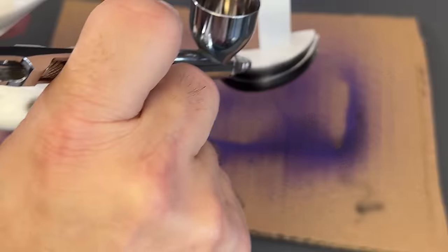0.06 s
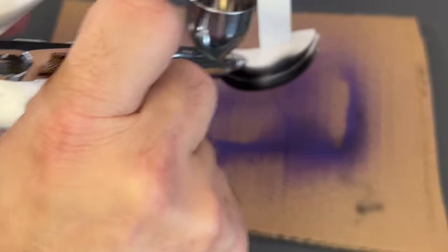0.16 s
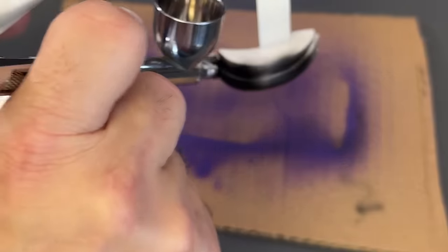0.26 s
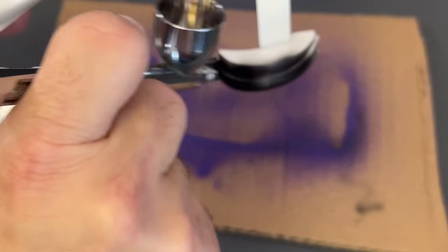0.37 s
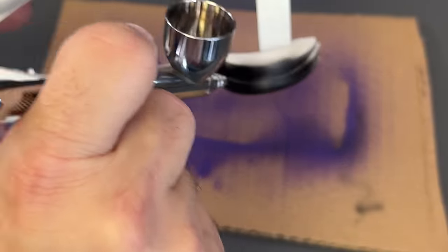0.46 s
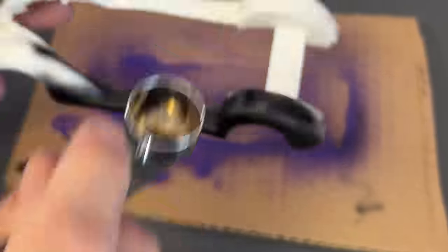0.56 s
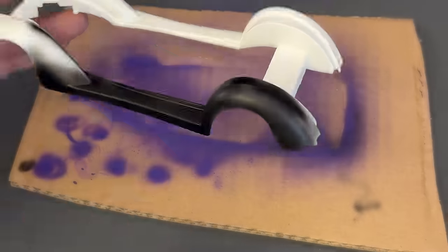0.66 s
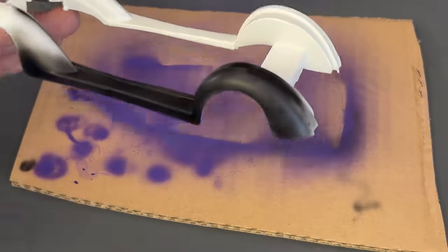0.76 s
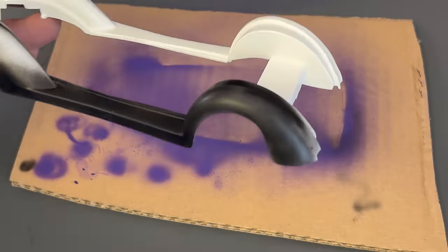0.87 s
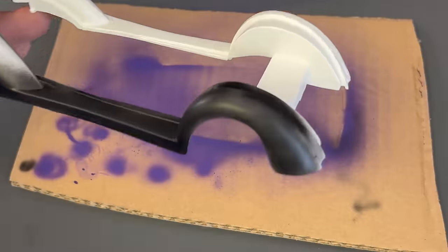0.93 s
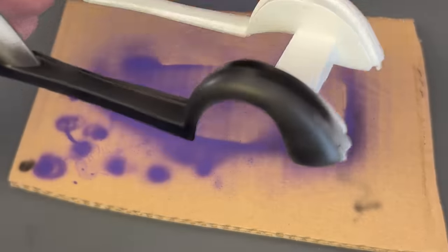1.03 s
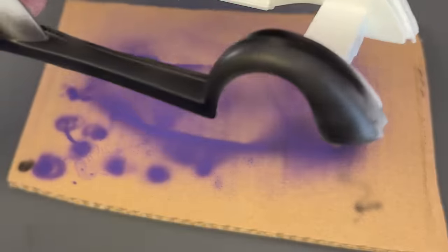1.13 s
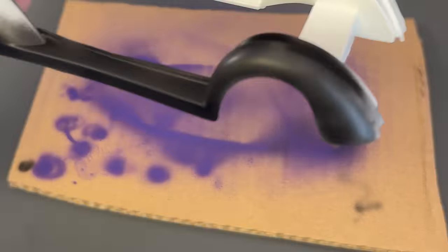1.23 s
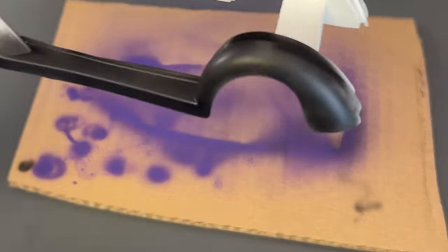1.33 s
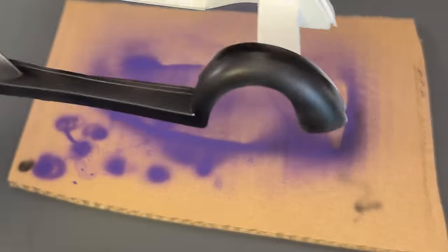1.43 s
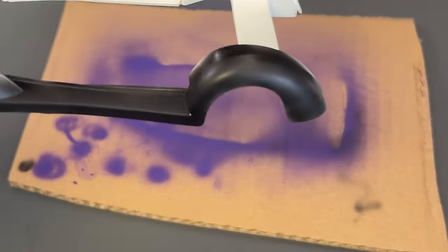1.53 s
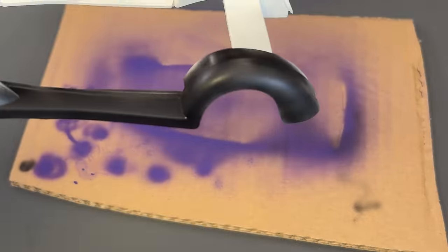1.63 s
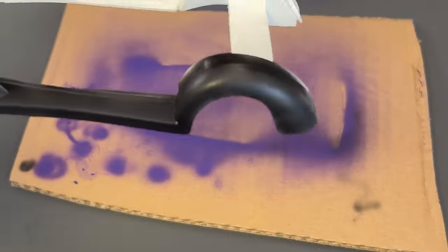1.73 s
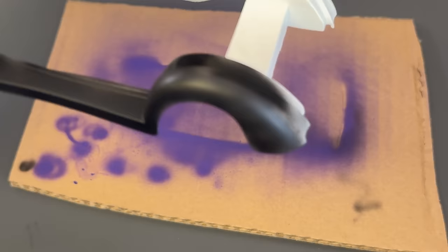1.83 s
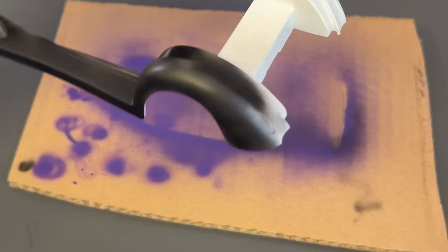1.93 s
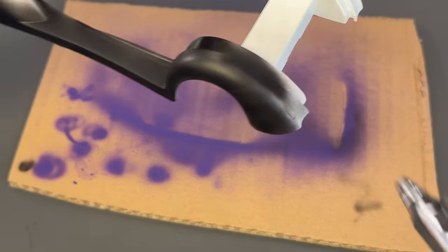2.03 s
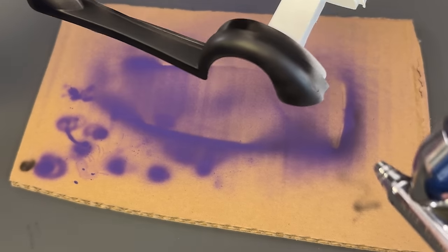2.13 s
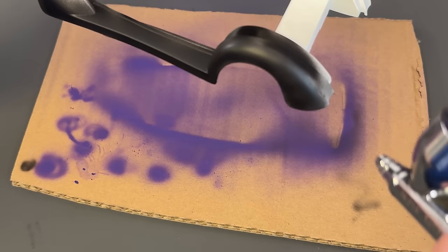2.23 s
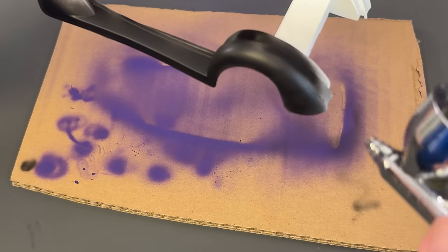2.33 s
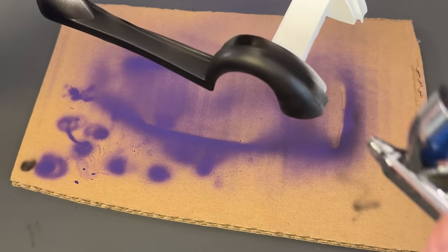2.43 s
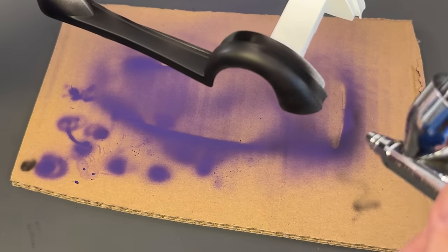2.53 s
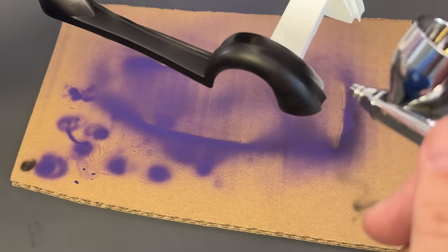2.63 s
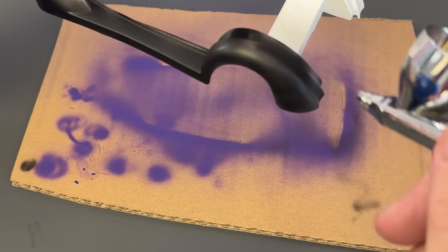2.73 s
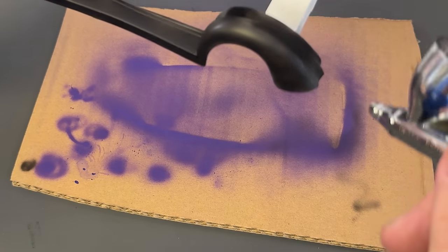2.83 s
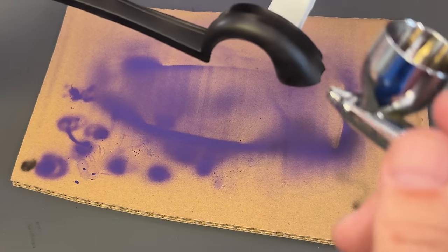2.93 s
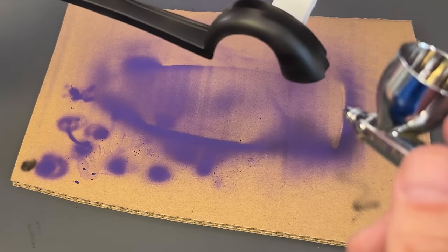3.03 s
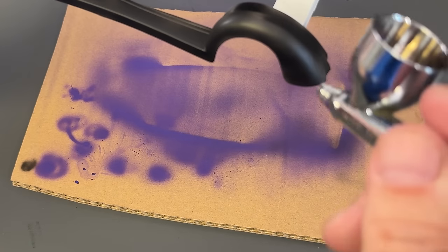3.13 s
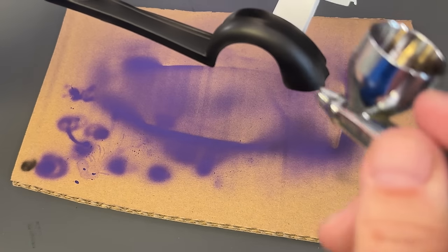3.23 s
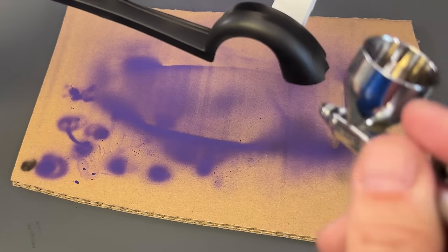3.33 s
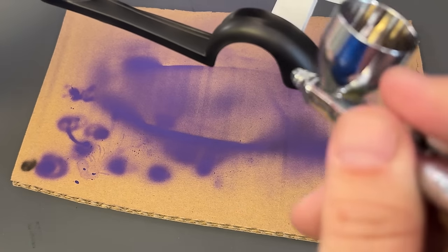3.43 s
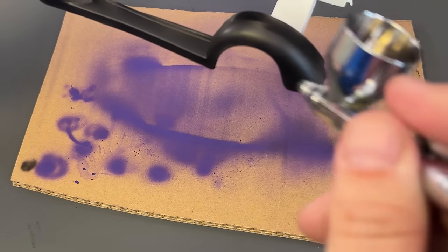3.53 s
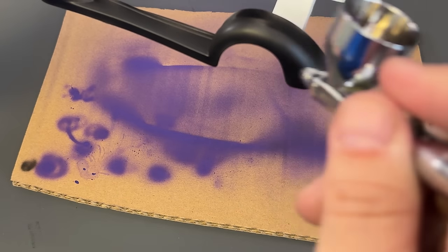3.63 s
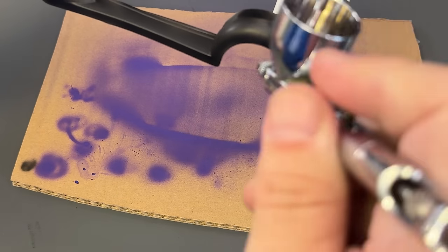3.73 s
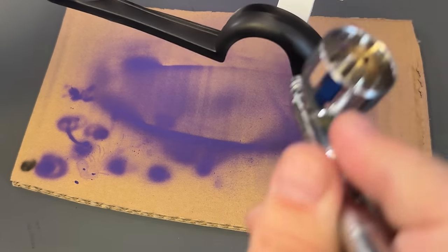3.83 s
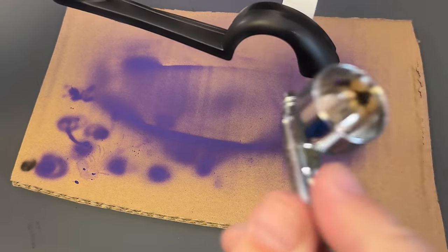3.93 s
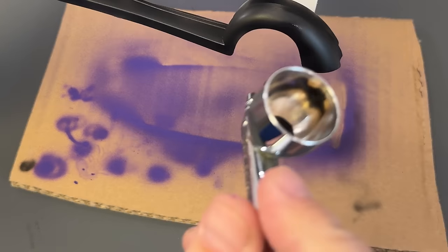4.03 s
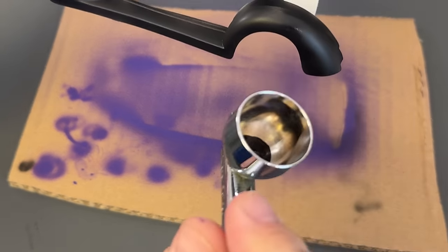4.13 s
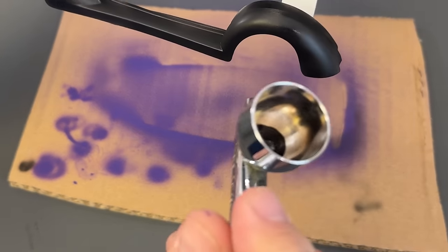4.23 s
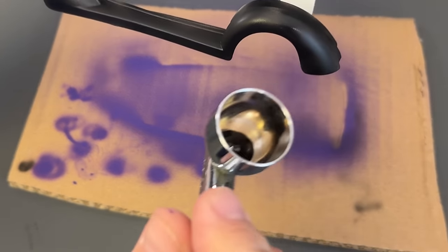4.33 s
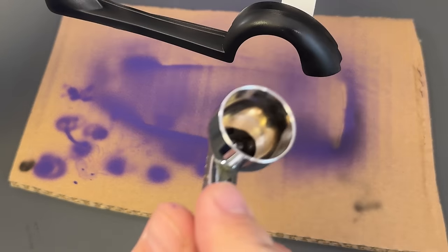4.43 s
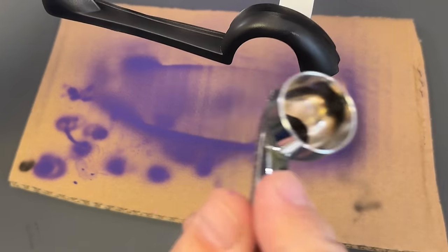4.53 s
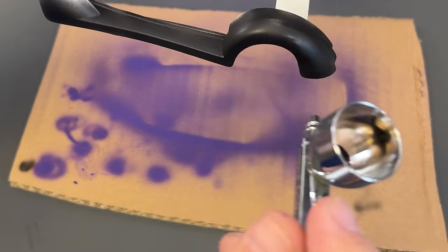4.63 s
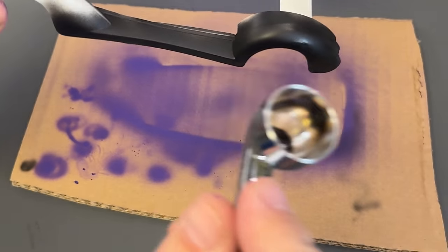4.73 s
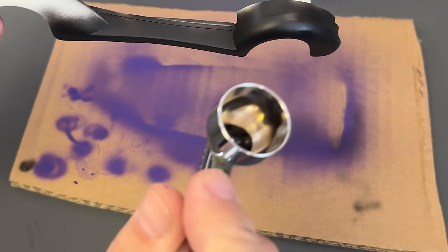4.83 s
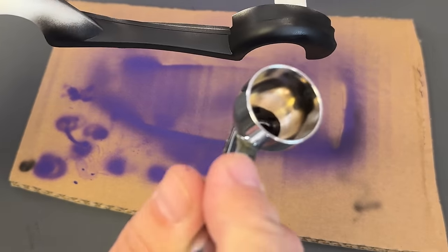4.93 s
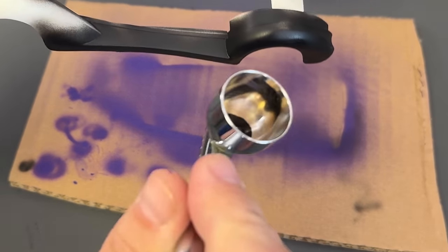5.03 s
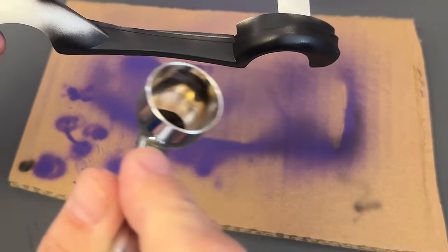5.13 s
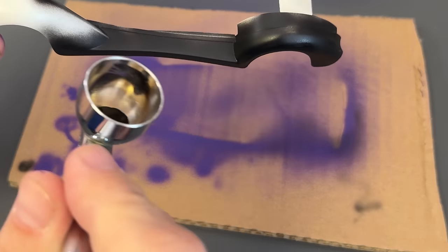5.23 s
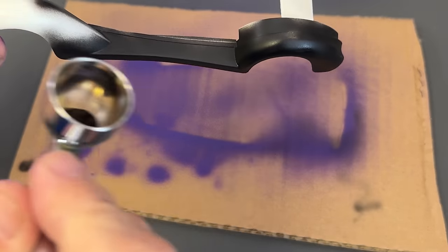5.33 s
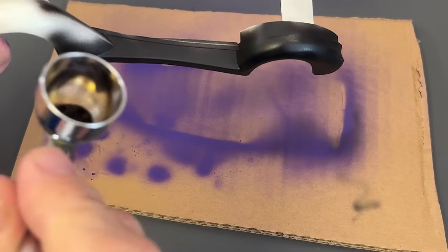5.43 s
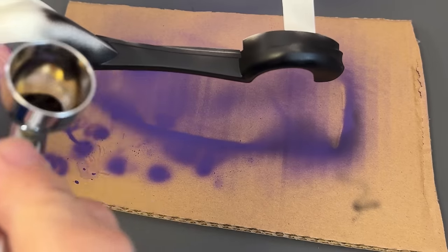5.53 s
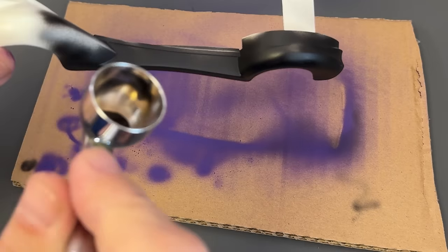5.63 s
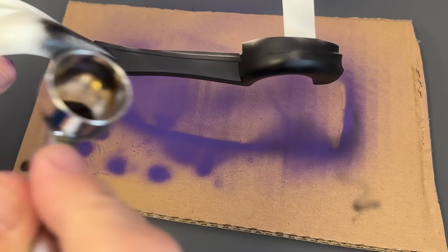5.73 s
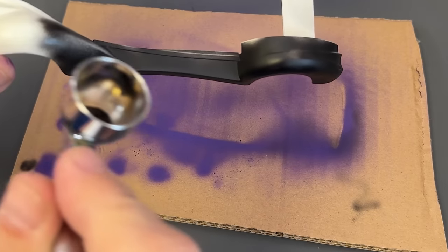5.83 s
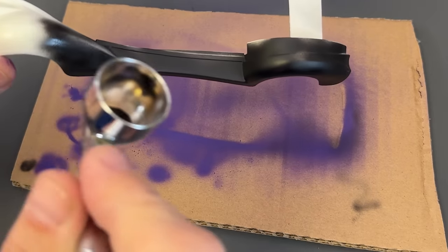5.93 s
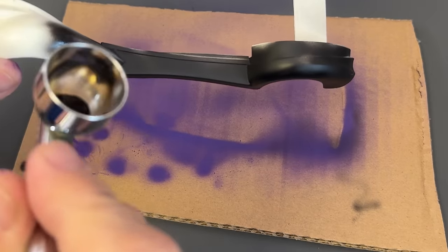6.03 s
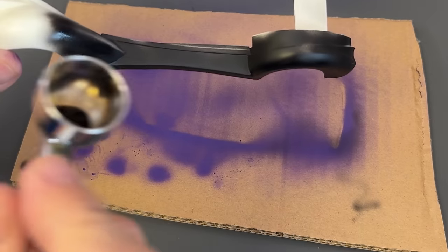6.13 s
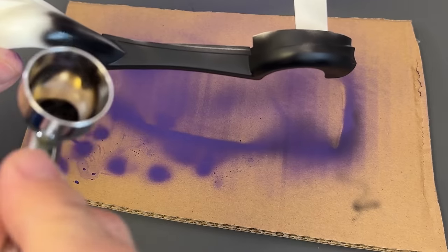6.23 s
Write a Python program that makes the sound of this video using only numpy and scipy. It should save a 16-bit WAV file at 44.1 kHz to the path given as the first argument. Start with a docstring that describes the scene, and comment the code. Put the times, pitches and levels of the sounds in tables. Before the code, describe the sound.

An airbrush sprays a small plastic part with a bright hiss and a lower rush of air. It cuts off after half a second, and the trigger clicks back. A faint air leak fills the pause, then a tiny spit opens a longer spell that swells and shifts in tone as the jet travels over the part. An extractor fan drones behind throughout, heard in a spray booth with close stereo microphones.

```python
"""A bright hiss and rush of air, close to a stereo microphone pair: an airbrush paints a small plastic
part in a spray booth, in two spells, with the extractor fan droning behind. The free jet hisses;
where it strikes the part it rushes lower, coloured by the rim, arch or arm that it meets, and swells
at each edge. The trigger clicks as it springs back after the first spell, and a faint leak hisses
until a spit of paint opens the second."""
import sys
import numpy as np
from scipy import signal
from scipy.fft import rfft, irfft
from scipy.io import wavfile
from scipy.ndimage import map_coordinates

SR = 44100
rng = np.random.default_rng(int(sys.argv[2]) if len(sys.argv) > 2 else 0)


def file_out(sig):
    """Save sig as 16-bit WAV at sys.argv[1]."""
    # one column per channel
    cols = np.atleast_2d(sig).T
    # limit, then scale
    lim = np.clip(cols, -1, 1)
    pcm = np.round(lim * 32767).astype(np.int16)
    wavfile.write(sys.argv[1], SR, pcm)


N = 277389
TIME = np.arange(N) / SR
FREQS = np.maximum(np.arange(N // 2 + 1) * SR / N, 1)

MOTOR_TURNS_HZ = 63.14
# strong overtones of the fan motor [multiple of the turning rate, level/dB]
MOTOR_ORDERS = [(1, -74.5), (2, -66.5), (3, -64), (4, -68.5), (5, -72), (6, -69), (9, -71), (11, -74.5),
                (12, -67.5), (13, -72.5), (14, -71), (15, -75.5), (18, -73), (19, -70), (20, -75),
                (21, -72.5), (22, -77), (23, -73.5), (25, -77.5), (29, -78), (33, -76), (36, -76),
                (37, -77), (38, -80), (43, -79), (45, -79.5), (49, -78), (50, -84), (65, -78.5), (72, -81)]
# the two spells of the air valve [opens t/s, shuts t/s]
SPELLS = [(-0.1, 0.534), (2.121, 6.4)]
# the hand sweeps the jet full onto the face of the part [t/s, length/s, swell/dB]
FACE_PASSES = [(0.243, 0.056, 6), (0.295, .03, 5), (0.435, 0.065, 3.5), (0.522, 0.018, 6),
               (2.965, 0.066, 3.5), (3.14, 0.055, 6), (3.285, 0.075, 6.5), (3.46, 0.077, 6.5),
               (3.59, 0.1, 4), (3.745, 0.068, 4), (3.885, 0.05, 5.5), (4.08, 0.036, 2), (4.52, 0.06, 3.5),
               (4.735, 0.07, 3), (4.88, 0.05, 1.5), (5.02, 0.085, 2), (5.31, 0.091, 3.5),
               (5.41, 0.084, 3.5), (5.555, 0.085, 4), (6.21, 0.074, 3)]
# spectrum of air on the part's flat arm, and of the spit [f/Hz, level/dB]
ARM_SPECTRUM = [(400, -12), (750, -4.5), (1150, -1), (1520, 2), (1850, -1.5), (2300, 0), (3050, -5),
                (3950, -1.5), (5300, -6), (6300, -6), (7300, -10), (8300, -10), (9000, -11.5), (12500, -11)]


def from_db(db):
    return 10 ** (np.asarray(db) / 20)


def rms_one(x):
    return x / np.sqrt(np.mean(x ** 2) + 1e-20)


def in_time(rows):
    """Each column of a curve at every sample."""
    times, *columns = np.transpose(rows)
    return [np.interp(TIME, times, column) for column in columns]


def during(span, ramp_s):
    """1 inside the span (from t/s, to t/s), with soft ends."""
    return np.clip(np.minimum(TIME - span[0], span[1] - TIME) / ramp_s + .5, 0, 1)


def swells(events, order=2):
    """A bell of dB per event, half as high at the ends of its length; higher orders flatten the top."""
    return sum(db * .5 ** (np.abs(2 * (TIME - t) / length) ** order) for t, length, db in events)


def drift(rate_hz):
    """A smooth random wander, rms 1."""
    knots = rng.standard_normal(int(N / SR * rate_hz * 2) + 2)
    return rms_one(np.interp(TIME * rate_hz * 2, np.arange(len(knots)), knots))


def colour(points):
    """Gain at every frequency from a short spectrum, falling away past its ends."""
    hz, db = np.transpose(points)
    ends = np.minimum(1, np.minimum(FREQS / hz[0], hz[-1] / FREQS)) ** 2
    return ends * from_db(np.interp(np.log(FREQS), np.log(hz), db))


def resonances(modes, order=2):
    """Gain at every frequency of resonances summed in power; higher orders give flatter tops."""
    gains = (from_db(db) / (1 + 2 * ((FREQS - hz) / width) ** order) for hz, width, db in modes)
    return np.sqrt(sum(gain ** 2 for gain in gains))


def noise(gain):
    """Turbulence of the given colour, rms 1."""
    return rms_one(irfft(rfft(rng.standard_normal(N)) * gain, N))


def swept(x, rows, width_hz):
    """Lifts or cuts one moving band."""
    hz, db = in_time(rows)
    carrier = np.exp(2j * np.pi * np.cumsum(hz) / SR)
    baseband = signal.filtfilt(*signal.butter(2, width_hz, fs=SR), x / carrier)
    band = 2 * np.real(carrier * baseband)
    return x + (from_db(db) - 1) * band


def widened(mid, side, width):
    """Left and right from a shared sound and an unrelated one, coloured by the width spectrum."""
    side = irfft(rfft(side) * colour(width), N)
    return np.array([mid + side, mid - side])


def wall_echoes(x, t60_s):
    """The booth's walls return a dense, dying scatter with about the power of the sound."""
    age = TIME[:SR // 3]
    echoes = rng.standard_normal(len(age)) * from_db(-60 * age / t60_s) * (age > .001)
    return signal.fftconvolve(x, echoes / np.linalg.norm(echoes))[:N]


def rumble(hz=89, width_hz=16, start_db=-60.5, fall_db_per_s=2):
    """A low rumble under the fan, slowly fading."""
    return from_db(start_db - fall_db_per_s * TIME) * noise(resonances([(hz, width_hz, 0)], order=4))


def motor_whine(order_limit=72, uneven_db=3.5, speed_wander=0.00051):
    """Every turn of the motor repeats one rough pattern: faint overtones between the strong ones."""
    turns = np.cumsum(MOTOR_TURNS_HZ * (1 + speed_wander * drift(1.8))) / SR
    orders = np.setdiff1d(np.arange(1, order_limit), [multiple for multiple, db in MOTOR_ORDERS])
    strength = from_db(uneven_db * rng.standard_normal(len(orders))) / np.sqrt(orders)
    angle = np.linspace(0, 1, 4096)
    cycles = np.outer(orders, angle) + rng.random((len(orders), 1))
    one_turn = strength @ np.sin(2 * np.pi * cycles)
    return rms_one(np.interp(turns % 1, angle, one_turn))


def fan_hum(trim_db=-1, waver_db=0.5, wander_rad=0.17, whistle_hz=2653):
    """The fan's hum, its motor's strong overtones and a thin whistle, each wavering a little."""
    # steady hum tones [f/Hz, level/dB]
    hum_tones = [(129.0, -64), (199.5, -67.5), (238.4, -60), (262.5, -56.5), (325.3, -66.5), (838, -75),
                 (1112, -72.5)]
    # the whistle grows [t/s, level/dB]
    whistle = [(0.6, -74), (0.88, -74), (0.98, -67), (1.6, -67.5), (2.1, -64.5)]
    overtones = [(multiple * MOTOR_TURNS_HZ, db) for multiple, db in MOTOR_ORDERS]
    hum = 0
    for hz, db in [*hum_tones, *overtones, (whistle_hz, in_time(whistle)[0])]:
        level = from_db(db + trim_db + waver_db * drift(4))
        phase = 2 * np.pi * (hz * TIME + rng.random()) + wander_rad * drift(3.0)
        hum += level * np.sin(phase)
    return np.sqrt(2) * hum


def extractor_fan(drone_db=-65, air_db=-56.5, duct_db=-61.5, whine_db=-72.5):
    """Behind the spray the motor hums, the booth's panels drone and air is drawn down the duct."""
    # panel resonances [f/Hz, width/Hz, level/dB]
    panel_modes = [(98, 19, 1), (132, 10, -1)]
    # air drawn through the fan [f/Hz, level/dB]
    air_spectrum = [(25, -44), (45, -21), (84, -16), (160, -6.5), (263, -11), (320, -10.5), (490, -12.7),
                    (734, -18.5), (1230, -24), (1940, -30.5), (2700, -31.5), (3340, -33), (6800, -38),
                    (8300, -43), (9500, -41), (10800, -34.5), (16000, -36.5)]
    # duct resonances [f/Hz, width/Hz, level/dB]
    duct_modes = [(269, 28, -1), (770, 120, -12.5), (1810, 65, -12.5), (2620, 95, -15), (4100, 60, -20),
                  (5500, 430, -28.5), (7040, 110, -27)]
    hum = fan_hum()
    drone = from_db(drone_db) * noise(resonances(panel_modes))
    air = from_db(air_db) * noise(colour(air_spectrum))
    duct = from_db(duct_db) * noise(resonances(duct_modes))
    return hum + from_db(whine_db) * motor_whine() + drone + air + duct


def leak():
    """Air leaks past the shut valve; it grows and swishes as the airbrush is brought back to the part."""
    # strength of the leak [t/s, level/dB]
    levels = [(0.58, -69), (1.0, -74), (1.35, -83), (1.76, -79), (1.9, -64.5), (2.12, -65)]
    # its spectrum [f/Hz, level/dB]
    spectrum = [(4500, -1), (15000, 0)]
    # its moving resonance [t/s, f/Hz, gain/dB]
    swish = [(1.8, 6300, 4), (1.89, 5450, 9), (1.98, 5300, 9), (2.05, 6050, 8)]
    hiss = rms_one(swept(noise(colour(spectrum)), swish, width_hz=520))
    valve_shut = during((SPELLS[0][1], SPELLS[1][0]), ramp_s=0.022)
    return from_db(in_time(levels)[0]) * valve_shut * hiss


def spill(peak_s=4.45, length_s=1.3, rest_db=-82, swell_db=25.2, hz=606, width_hz=250):
    """Air that misses the part lands on the cardboard below with a dull rush."""
    level_db = rest_db + swells([(peak_s, length_s, swell_db)], order=4)
    return from_db(level_db) * noise(resonances([(hz, width_hz, 0)], order=4))


def spit(level_db=-43.5, hold_s=0.015, fall_db_per_s=548):
    """Paint left on the needle is blown off in one short burst as the valve reopens."""
    fall_db = fall_db_per_s * np.clip(TIME - SPELLS[1][0] - hold_s, 0, 1)
    return from_db(level_db - fall_db) * during(SPELLS[1], ramp_s=0.0082) * noise(colour(ARM_SPECTRUM))


def trigger(at_s=0.5573, gain_db=-25, crack_db=-1.5, crack_t60_s=0.002,
            rattle_db=-23, rattle_t60_s=0.031):
    """The sprung lever hits its stop with a dry crack; its spring rattles and the steel body rings."""
    # modes of the steel body [f/Hz, level/dB, t60/s]
    body_modes = [(4100, -14, .004), (6500, -6, 0.0066), (7330, -13.5, 0.034), (9500, -8, .003),
                  (12700, -11, 0.012)]
    age = np.maximum(TIME - at_s, 0)
    ring = sum(from_db(db - 60 * age / t60) * np.sin(2 * np.pi * hz * age) for hz, db, t60 in body_modes)
    crack = from_db(crack_db - 60 * age / crack_t60_s)
    rattle = from_db(rattle_db - 60 * age / rattle_t60_s)
    contact = rng.standard_normal(N) * (age > 0) * (crack + rattle)
    treble_band = signal.butter(2, [4600, 14000], "band", fs=SR, output="sos")
    return from_db(gain_db) * signal.sosfilt(treble_band, ring + contact + 1e-18)


def hand_aim(miss_rush_share=0.55, face_sizzle_share=0.67):
    """The dB that the aim adds to rush and to sizzle: faces mostly rush, edges sizzle, misses dip."""
    # an edge splits the jet [t/s, length/s, swell/dB]
    edges = [(0.21, 0.058, 4.5), (2.275, 0.021, 6), (2.375, .025, 3.5), (2.55, 0.029, 5.5),
             (2.585, 0.019, 7), (2.847, 0.013, 2), (2.912, 0.021, 6.5), (3.029, 0.022, 8),
             (3.064, 0.025, 4.5), (3.2, 0.024, 4.5), (3.645, 0.023, 7.5), (3.79, 0.029, 5.5),
             (3.858, 0.028, 4), (4.42, 0.04, 1), (5.4, 0.017, 5.5), (6.23, 0.068, 4)]
    # the jet slips past the part [t/s, length/s, loss/dB]
    misses = [(2.409, 0.02, 12), (2.877, 0.038, 17), (3.822, 0.036, 3), (3.945, 0.054, 3), (4.2, 0.05, 1),
              (4.65, 0.19, 4.5), (5.115, 0.1, 4.5), (5.46, 0.066, 2)]
    face, edge, miss = swells(FACE_PASSES), swells(edges), swells(misses, order=4)
    return face - miss_rush_share * miss, face_sizzle_share * face + edge - miss


def impact(turbulence, rows, aim_db, rush_db, sizzle_db, tremor_db, tremor_rush_share=0.77, edge_hz=2650):
    """Air breaks on the part: large eddies rush, small ones sizzle and follow the hand's tremor more."""
    level_db, bright_db = in_time(rows)
    low = irfft(rfft(turbulence) / (1 + (FREQS / edge_hz) ** 16), N)
    tremor = tremor_db * drift(25)
    rush = rms_one(low) * from_db(level_db + rush_db + aim_db[0] + tremor_rush_share * tremor)
    sizzle = rms_one(turbulence - low) * from_db(level_db + bright_db + sizzle_db + aim_db[1] + tremor)
    return rush + sizzle


def arch_turbulence(wander=0.008):
    """The hollow rings in the air, higher and clearer as the nozzle enters, wavering with the hand."""
    # resonances of the hollow [f/Hz, width/Hz, level/dB]
    modes = [(770, 220, -9.5), (1220, 400, -1.5), (1630, 430, -0.5), (2260, 400, 1), (3670, 530, -6.5),
             (4270, 630, -0.8), (5160, 460, 0), (6340, 450, -8)]
    # broad rush beneath them [f/Hz, level/dB]
    bed = [(400, -13), (800, -15.5), (1250, -10), (2000, -1.5), (2700, -4), (3500, -9.5), (5000, -9),
           (6800, -9), (9000, -10), (11500, -12.5), (14000, -27)]
    # the nozzle moves in [t/s, pitch ratio, ringing over the bed/dB]
    depth = [(2.25, 0.96, 0.5), (2.8, 0.97, -2.5), (3.05, 0.975, -1.5), (3.55, 1, 2.5), (3.9, 0.992, 5.5),
             (4.55, 0.99, 3.5)]
    # two treble resonances that glide up [t/s, f/Hz, gain/dB]
    lower_peak = [(2.85, 7540, 4), (3.85, 7720, 8), (4.1, 7660, 6.5)]
    upper_peak = [(2.9, 9700, 1.5), (3.65, 10200, 5), (4.05, 10450, 10)]
    pitch, ringing_db = in_time(depth)
    position = np.cumsum(pitch * (1 + wander * drift(4)))
    ringing = map_coordinates(noise(resonances(modes, order=4)), [position], order=3, mode="wrap")
    share = from_db(ringing_db)
    hollow = (share * ringing + noise(colour(bed))) / np.hypot(1, share)
    return swept(swept(hollow, lower_peak, width_hz=520), upper_peak, width_hz=440)


def arm_turbulence():
    """Air on the flat arm: a hollow rush with one moving resonance and one moving gap."""
    # the echo off the arm cancels a band that sinks as the nozzle travels [t/s, f/Hz, gain/dB]
    notch = [(4.58, 3840, -1), (4.8, 3870, -7.5), (5.2, 3750, -9), (5.45, 3230, -0.5), (6.29, 2880, -1)]
    # the arm's resonance jumps up as the jet reaches its flat stretch [t/s, f/Hz, gain/dB]
    peak = [(4.58, 5270, 4.5), (5.0, 5250, 4), (5.4, 6100, 3), (6.29, 6000, 4)]
    hollow = swept(noise(colour(ARM_SPECTRUM)), notch, width_hz=430)
    return swept(hollow, peak, width_hz=240)


def with_arch_echo(x, low_hz=6800, high_hz=14200):
    """The small curved wall reflects only short waves; they return a fraction of a millisecond late."""
    # the echo's comb slides up as the nozzle nears [t/s, tooth spacing/Hz, echo share 0-1]
    comb = [(2.65, 2370, 0), (2.9, 2400, 0.3), (3.4, 2400, 0.38), (3.85, 2570, 0.26), (4.5, 2600, 0.1),
            (4.65, 2620, 0)]
    spacing_hz, share = in_time(comb)
    treble = signal.sosfiltfilt(signal.butter(4, [low_hz, high_hz], "band", fs=SR, output="sos"), x)
    echo = map_coordinates(treble, [np.arange(N) - SR / spacing_hz], order=5)
    return x - treble + (treble + share * echo) / np.hypot(1, share)


def spray_on_part(arch_span_s=(2.25, 4.57), arm_span_s=(4.57, 6.4)):
    """The jet works on the rim in the first spell, then plays into the arch and travels down the arm."""
    # air breaking on the rim [f/Hz, level/dB]
    rim_spectrum = [(350, -28), (600, -9.5), (760, -8.5), (1020, -7.5), (1110, -2.5), (1200, -5), (1500, 1),
                    (1920, -3), (3480, 2), (3950, -6.5), (7930, -5.5), (9700, -20), (10600, -7),
                    (12000, -11), (15600, -38), (22000, -120)]
    # the nozzle nears and leaves each shape [t/s, level/dB, extra sizzle/dB]
    on_rim = [(0.0, -48, 1.5), (0.53, -48.5, 0)]
    on_arch = [(2.25, -46, -1.5), (2.52, -44.5, -2), (2.72, -48, 7), (3.0, -46.5, 3.5), (3.4, -46.5, 7),
               (3.7, -43, 2.5), (4.0, -39.5, 0.5), (4.56, -41.5, 0.5)]
    on_arm = [(4.58, -44, -1.5), (4.85, -43, 1), (5.25, -45, 2), (5.8, -43.5, 0), (5.95, -44, 3.5),
              (6.29, -45, 1.5)]
    aim_db = hand_aim()
    rim = impact(noise(colour(rim_spectrum)), on_rim, aim_db, rush_db=-1, sizzle_db=-0.5, tremor_db=0.5)
    arch = impact(arch_turbulence(), on_arch, aim_db, rush_db=-0.22, sizzle_db=-0.07, tremor_db=0.75)
    arm = impact(arm_turbulence(), on_arm, aim_db, rush_db=-1.5, sizzle_db=-1.2, tremor_db=0.95)
    return (rim * during(SPELLS[0], ramp_s=0.0042)
            + arch * during(arch_span_s, ramp_s=0.027)
            + arm * during(arm_span_s, ramp_s=0.013))


def free_jet(first_flow_db=-50, trim_db=4.0, flutter_db=1.2, pass_share=0.16, turned_span_s=(5.35, 6.6)):
    """The finest eddies leave the open nozzle as a bright hiss; the part throws a little of it back."""
    # flow in the second spell [t/s, level/dB]
    flow = [(2.13, -50.5), (2.83, -46), (2.86, -49.5), (3.01, -46.5), (4.31, -48.5), (4.41, -45),
            (4.67, -48.5), (4.83, -48), (4.89, -50), (5.57, -46), (6.07, -49.5), (6.28, -45.5)]
    # the hiss before and after the airbrush turns to the far end of the arm [f/Hz, level/dB]
    spectrum = [(1000, -22), (4000, -7), (6000, -8), (6900, -6), (7900, -6), (9200, -4), (11200, -0.5),
                (13600, 0), (14100, 2.5), (14800, 3), (15650, 6.5), (16100, 0)]
    turned_spectrum = [(1000, -27), (4000, -10), (7000, -20), (10500, -2), (11300, -5), (12000, 4.5),
                       (13500, -1), (14750, 10), (15500, 5), (16000, 3)]
    flow_db = np.where(TIME < SPELLS[1][0], first_flow_db, in_time(flow)[0])
    level_db = flow_db + trim_db + pass_share * swells(FACE_PASSES) + flutter_db * drift(32)
    valve = sum(during(span, ramp_s=0.0097) for span in SPELLS) ** 2
    turned = during(turned_span_s, ramp_s=0.089)
    hiss = np.sqrt(1 - turned) * noise(colour(spectrum))
    hiss += np.sqrt(turned) * noise(colour(turned_spectrum))
    return valve * from_db(level_db) * hiss


def hand_shaded(stereo):
    """The hand moves and shades one side of the pair, tipping a few bands mostly to the left."""
    # balance at full band weight [t/s, left minus right/dB]
    balance = [(0, 3), (3.85, -2), (4.1, 4), (4.75, 0.5), (5.08, 2.5), (5.3, 7.5), (6.29, 8.5)]
    # the shaded bands [f/Hz, width/Hz, weight/dB]
    shaded_bands = [(1120, 380, -6), (2230, 300, -2), (3700, 590, -1)]
    bands = irfft(rfft(stereo) * resonances(shaded_bands, order=4), N)
    gains = from_db(np.array([[.5], [-.5]]) * in_time(balance)[0])
    return stereo + bands * (gains - 1)


def scene(booth_db=-15):
    """At the booth: the airbrush close to the microphones, the walls around it and the fan behind."""
    # stereo width of each source [f/Hz, side gain/dB]
    spray_width = [(300, -11), (900, -13.5), (1500, -20), (3800, -22.5), (4700, -73), (16000, -45)]
    fan_width = [(60, -33), (110, -22), (200, -16.5), (380, -16.5), (700, -8), (1290, -1), (2900, -2.5),
                 (4400, -7), (5200, -32), (16000, -42)]
    direct = with_arch_echo(free_jet() + spray_on_part()) + spill() + spit() + leak() + trigger()
    near = direct + from_db(booth_db) * wall_echoes(direct, t60_s=0.11)
    airbrush = widened(near, wall_echoes(direct, t60_s=0.17), spray_width)
    fan = widened(extractor_fan(), extractor_fan(), fan_width)
    return hand_shaded(airbrush) + fan + rumble()


def record(dry, low_cut_hz=45, high_cut_hz=15780):
    """The treble is slightly out of phase between left and right; deepest bass and top are cut."""
    # left-right phase in the treble [f/Hz, left lead/rad]
    treble_phase = [(5900, 0), (6600, 0.56), (7400, 0.72), (8500, 0.45), (10000, 0.27), (11000, -0.027),
                    (14300, 0.065), (15400, -0.86)]
    lead = np.interp(FREQS, *np.transpose(treble_phase))
    skewed = irfft(rfft(dry) * np.exp(1j * np.array([[.5], [-.5]]) * lead), N)
    low_cut = signal.sosfilt(signal.butter(2, low_cut_hz, "high", fs=SR, output="sos"), skewed)
    return signal.sosfilt(signal.ellip(12, .2, 80, high_cut_hz, fs=SR, output="sos"), low_cut)


dry = scene()
out = record(dry)
file_out(out)
```